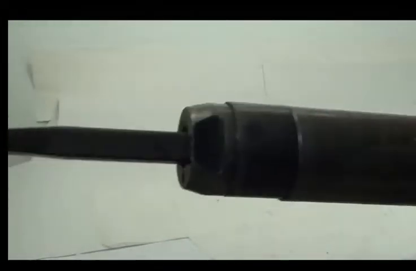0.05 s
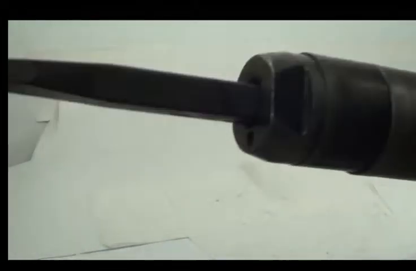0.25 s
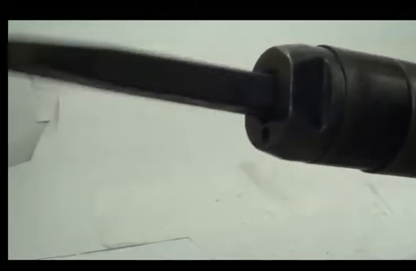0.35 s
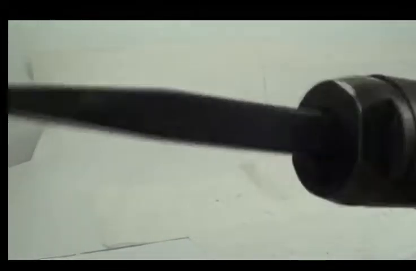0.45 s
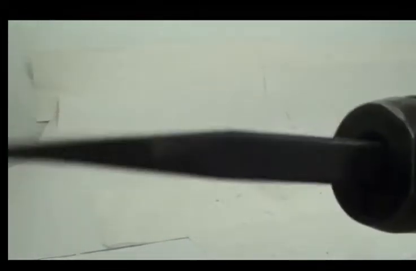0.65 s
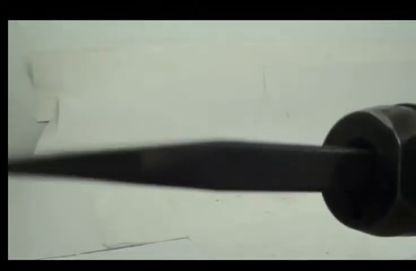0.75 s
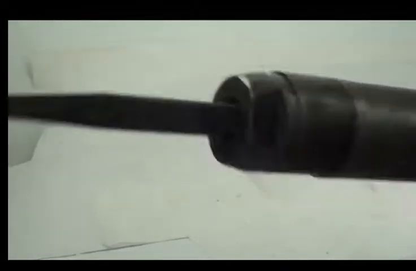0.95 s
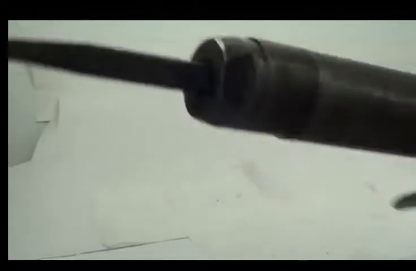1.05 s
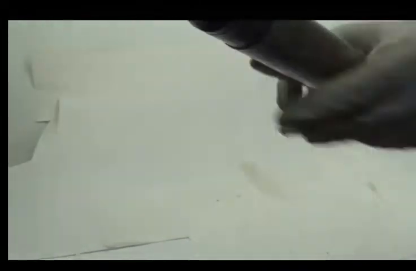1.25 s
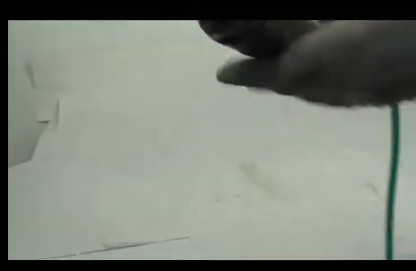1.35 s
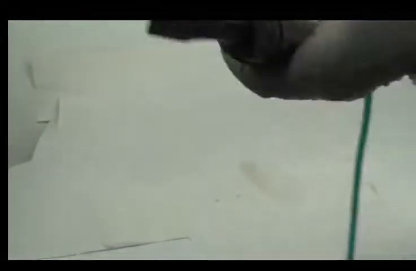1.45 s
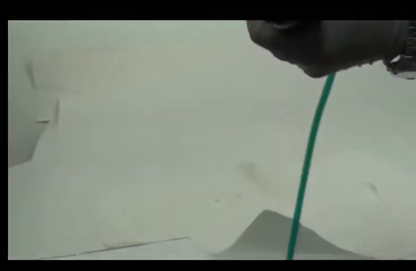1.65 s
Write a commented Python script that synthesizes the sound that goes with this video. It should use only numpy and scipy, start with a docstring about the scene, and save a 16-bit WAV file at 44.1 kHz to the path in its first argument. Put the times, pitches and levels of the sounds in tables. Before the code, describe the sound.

Pneumatic chisel fired twice in open air, fast metallic hammering and hiss, then a quiet room

```python
"""A quiet room with a faint hum; then air hisses in, a valve squeals, and an air chisel hammers close by.
The hand-held tool is triggered twice with nothing under its blade; the second run is slower and weaker.
A piston making about 50 strokes a second in the first run strikes the steel chisel: noise clacks, sine rings.
Each stroke also puffs out exhaust (low pulses and gusts of noise) and makes the hiss (coloured noise) surge.
The loose chisel rings on when the trigger is let go, and the room adds a short stereo tail."""
import sys
import numpy as np
from scipy import signal
from scipy.fft import rfft, irfft
from scipy.io import wavfile
from scipy.ndimage import uniform_filter1d

SR = 44100
rng = np.random.default_rng(int(sys.argv[2]) if len(sys.argv) > 2 else 0)


def int16_out(signal):
    """Quantize to a 16-bit WAV file."""
    q = np.round(np.clip(np.atleast_2d(signal).T, -1, 1) * 32767)
    wavfile.write(sys.argv[1], SR, q.astype(np.int16))


N = 74970
TIME = np.arange(N) / SR


def amp(db):
    """Turns decibels into gain."""
    return 10 ** (np.asarray(db) / 20)


def unit(x):
    """Scales a sound to rms 1."""
    return x / np.sqrt(np.mean(x ** 2) + 1e-20)


def curve(points):
    """Reads a time table at every sample, with straight lines between its points."""
    return np.interp(TIME, *np.transpose(points))


def read(points, hz):
    """Reads a frequency table at the given frequencies, on a logarithmic pitch scale."""
    f, value = np.transpose(points)
    return np.interp(np.log(hz + 1), np.log(f + 1), value)


def add(mix, s, sound):
    """Mixes a sound into mix, starting at s seconds."""
    part = mix[round(s * SR):][:len(sound)]
    part += sound[:len(part)]


def noise(spectrum):
    """Random noise with the colour of a spectrum table, scaled to rms 1."""
    white = rfft(rng.standard_normal(N))
    gain = amp(read(spectrum, np.fft.rfftfreq(N, 1 / SR)))
    return unit(irfft(white * gain, N))


def wander(rate_hz):
    """Smooth random motion of rms 1; a higher rate makes it move faster."""
    white = rfft(rng.standard_normal(N))
    smoothing = np.exp(-(np.fft.rfftfreq(N, 1 / SR) / rate_hz) ** 2)
    return unit(irfft(white * smoothing, N))


def pulse(spectrum, size=4096):
    """A short pulse with the given colour that starts at once (minimum phase)."""
    log_gain = np.log(amp(read(spectrum, abs(np.fft.fftfreq(size, 1 / SR)))))
    return np.fft.ifft(np.exp(np.conj(signal.hilbert(log_gain)))).real


# piston speed in each run, from first stroke to stall: t/s, f/Hz (strokes per second)
FIRST_RUN_SPEED = [(0.2548, 38.2), (0.29, 55.6), (0.39, 50.8), (0.49, 50.7), (0.61, 51.2), (0.69, 47.7),
                   (0.73, 52.5), (0.8, 42.8), (0.85, 30.2)]
SECOND_RUN_SPEED = [(1.0124, 38.2), (1.09, 48.1), (1.16, 43.7), (1.225, 43.4)]


def piston(turn):
    """Adds up the speed to find when the piston passes a given share of its cycle, in both runs."""
    times = []
    for speed in (FIRST_RUN_SPEED, SECOND_RUN_SPEED):
        t = np.arange(speed[0][0], speed[-1][0], 1 / SR)
        turns = np.cumsum(np.interp(t, *np.transpose(speed))) / SR
        times.extend(np.interp(np.arange(turn, turns[-1], 1), turns, t))
    return np.array(times)


# force of the piston: t/s, level/dB
PISTON_FORCE = [(.25, -2.5), (.29, -1), (.47, 1.5), (.72, 1), (.81, -2), (.85, -16.5), (1.01, -11.5),
                (1.06, -5), (1.22, -10)]


def force_at(s):
    """Force of the piston in dB at s seconds: it sets how strong the blows, puffs and surges are."""
    return np.interp(s, *np.transpose(PISTON_FORCE))


CONTACT_RISE_S, CLACK_DECAY_S = .0007, .0036


def clack(level_db):
    """Loudness shape of one steel-on-steel contact: a very fast rise and a short decay."""
    t = np.arange(SR // 20) / SR
    return amp(level_db) * np.minimum(t / CONTACT_RISE_S, 1) * np.exp(-t / CLACK_DECAY_S)


# modes (ringing tones) of the chisel:
# f/Hz, level/dB at full force, level/dB at low force, t60/s (time to fall 60 dB) while held in the barrel
CHISEL_MODES = [(2450, -39, -31, .14), (2530, -38, -31, .11), (5203, -16, -19, .07), (5370, -26, -27, .04),
                (6236, -12, -19, .11), (7250, -27, -28, .035), (8775, -15, -13, .1), (9040, -27, -25, .04),
                (9620, -18, -17, .085), (11365, -20, -26, .13), (13590, -28, -27, .05),
                (13710, -24, -20, .11)]
LOW_FORCE_DB = -7  # at or below this force the low-force levels apply fully
MODE_SPREAD_DB, MODE_WOBBLE_HZ = 1.8, 36


def ring(s, level_db):
    """The chisel's modes after a blow; their balance shifts with force and they wobble as it rattles."""
    hz, full_db, low_db, t60 = np.transpose(CHISEL_MODES)[:, :, None]
    t = np.arange(SR // 6) / SR
    low = np.clip(force_at(s) / LOW_FORCE_DB, 0, 1)
    size, phase = rng.standard_normal((2, len(CHISEL_MODES), 1))
    jitter = rng.standard_normal((len(CHISEL_MODES), len(t)))
    wobble = unit(uniform_filter1d(jitter, size=120, axis=1))
    mode_db = level_db + full_db + low * (low_db - full_db) + MODE_SPREAD_DB * size
    decay = 1000 ** (-t / t60)
    turns = np.cumsum(hz + MODE_WOBBLE_HZ * wobble, axis=1) / SR + phase
    tones = amp(mode_db) * decay * np.sin(2 * np.pi * turns)
    return tones.sum(0) * np.minimum(t / CONTACT_RISE_S, 1)


# colour of the contact noise: f/Hz, level/dB per Hz (relative)
CLACK_COLOUR = [(40, -51), (200, -32.5), (900, -19.5), (1800, -20), (3300, -15.5), (4300, -18), (5200, 2.5),
                (6200, -2.5), (7300, -4), (8100, -4), (9100, 1), (10500, -11), (12500, -12), (16000, -20)]
# hard knocks of the loose chisel against its retainer: t/s, level/dB
RETAINER_KNOCKS = [(.259, -5), (.297, -6), (0.314, -1), (0.8433, 2.5), (1.105, -5.5), (1.149, -4),
                   (1.194, -1), (1.217, -3.5)]
CLACK_DB, KNOCK_RING_DB = -7, -6.5
BLOW_DELAY_S, BLOW_JITTER_S, BLOW_SPREAD_DB = .0014, .0004, 1.2
REBOUND_DB, REBOUND_MIN_S, REBOUND_MAX_S = -4.5, .004, .016  # delays after the blow


def hammering():
    """Each stroke clacks on the chisel and rings it; the chisel rebounds and sometimes knocks its retainer."""
    contacts, rings = np.zeros(N), np.zeros(N)
    for s in piston(0):
        blow_db = force_at(s) + BLOW_SPREAD_DB * rng.standard_normal()
        blow = s + BLOW_DELAY_S + BLOW_JITTER_S * rng.standard_normal()
        rebound = blow + REBOUND_MIN_S + (REBOUND_MAX_S - REBOUND_MIN_S) * rng.random()
        for at, level_db in ((blow, blow_db), (rebound, blow_db + REBOUND_DB)):
            add(contacts, at, clack(level_db))
            add(rings, at, ring(at, level_db))
    for s, level_db in RETAINER_KNOCKS:
        add(contacts, s, clack(level_db))
        add(rings, s, ring(s, level_db + KNOCK_RING_DB))
    return amp(CLACK_DB) * contacts * noise(CLACK_COLOUR) + rings


# the chisel floats free and its nearest mode sings until it touches the barrel again:
# t/s, f/Hz, level/dB, free time/s
FREE_CHISEL = [(.258, 11360, -15, 0.011), (.844, 11360, -18.5, 0.054), (.844, 8770, -24, .045),
               (0.845, 6236, -22.5, 0.041), (1.149, 8770, -7, .06), (1.194, 13700, -24.5, 0.048),
               (1.217, 8770, -12, .078), (1.217, 5200, -20, 0.049), (1.217, 9620, -23, .048)]
FREE_T60_S, CAUGHT_T60_S = .68, .06  # the second decay joins the first once the chisel is caught
FREE_FLUTTER_DB = 1.1


def free_rings():
    """One mode sings on while the chisel floats, then dies quickly as it is caught."""
    out, t = np.zeros(N), np.arange(SR // 2) / SR
    modes = np.array(CHISEL_MODES)[:, 0]
    for s, near_hz, level_db, free_s in FREE_CHISEL:
        hz = modes[np.argmin(abs(modes - near_hz))] + 22 * wander(110)[:len(t)]
        fade = 1000 ** (-t / FREE_T60_S - np.maximum(t - free_s, 0) / CAUGHT_T60_S)
        level = amp(level_db + FREE_FLUTTER_DB * wander(70)[:len(t)])
        rise = np.minimum(t / CONTACT_RISE_S, 1)
        add(out, s, level * fade * rise * np.sin(2 * np.pi * np.cumsum(hz) / SR))
    return out


# colour of one exhaust puff: f/Hz, level/dB per Hz
PUFF_COLOUR = [(20, -45.5), (55, -21), (100, -2.5), (160, -0.5), (280, 1.5), (450, 0.5), (700, -8),
               (1100, -19), (2000, -33), (5000, -62)]
# colour of the turbulence after each puff: f/Hz, level/dB per Hz (relative)
GUST_COLOUR = [(25, -26.5), (60, -14), (110, -4.5), (250, -1.5), (420, -1.5), (700, -9), (1300, -15.5),
               (3000, -37)]
# echoes of the puffs from nearby surfaces: delay t/s, level/dB
PUFF_ECHOES = [(.0042, -15.5), (.0075, -14.5), (0.0123, -16.5)]
PUFF_DB, PUFF_LEAD_S, PUFF_JITTER_S, PUFF_SPREAD_DB = 13, .00081, .00045, .7
# the return puff: share of the cycle, level, and how much of the force in dB it follows
RETURN_TURN, RETURN_DB, RETURN_FORCE_SHARE = .49, -14, .55
GUST_DB, GUST_DECAY_S = -35.5, .0092


def exhaust():
    """Air puffs out low on each forward stroke, weaker on the return, trailed by a gust and echoes."""
    kicks, t = np.zeros(N), np.arange(SR // 10) / SR
    for turn, stroke_db, share in ((0, 0, 1), (RETURN_TURN, RETURN_DB, RETURN_FORCE_SHARE)):
        for s in piston(turn):
            late, size = rng.standard_normal(2)
            kick_db = stroke_db + share * force_at(s) + PUFF_SPREAD_DB * size
            add(kicks, s - PUFF_LEAD_S + PUFF_JITTER_S * late, amp([kick_db]))
    puffs = -amp(PUFF_DB) * signal.fftconvolve(kicks, pulse(PUFF_COLOUR))[:N]
    gust_shape = signal.fftconvolve(kicks, np.exp(-t / GUST_DECAY_S))[:N]
    out = puffs + amp(GUST_DB) * noise(GUST_COLOUR) * gust_shape
    for delay_s, level_db in PUFF_ECHOES:
        add(out, delay_s, amp(level_db) * puffs)
    return out


# air flow through the valve: t/s, level/dB
AIR_FLOW = [(0, -58.5), (.19, -59), (.199, -36), (.215, -30.5), (.235, -17.5), (.29, -17.5), (.76, -18.5),
            (.83, -22.5), (.87, -31), (.91, -42), (.947, -44.5), (.97, -27.5), (1.015, -19.5),
            (1.09, -16.5), (1.17, -19), (1.23, -23), (1.27, -36), (1.34, -69.5)]
# colour of the escaping air: f/Hz, level/dB per Hz (relative)
HISS_COLOUR = [(40, -51.5), (200, -30), (600, -23), (1200, -29.5), (2100, -24), (3200, -12.5),
               (4200, -15.5), (5200, -6.5), (6400, -1.5), (7600, -4.5), (10000, -7.5), (12500, -13.5),
               (14500, -13), (16000, -18)]
# surge depth at 0 dB force, share of the cycle where it peaks, random flutter
HISS_PULSING, HISS_PEAK_TURN, HISS_FLUTTER_DB = .21, .3, 1.22


def hiss():
    """Escaping air follows the flow and surges once in every stroke."""
    strokes = piston(0)
    turns = np.interp(TIME, strokes, np.arange(len(strokes)))
    depth = HISS_PULSING * amp(force_at(TIME))
    surge = 1 + depth * np.cos(2 * np.pi * (turns - HISS_PEAK_TURN))
    return noise(HISS_COLOUR) * surge * amp(curve(AIR_FLOW) + HISS_FLUTTER_DB * wander(150))


# squeal of the opening valve: t/s, level/dB
VALVE_SQUEAL = [(.195, -56.5), (.222, -33), (.231, -18.5), (.236, -6), (.246, -11.5), (.254, -30),
                (.265, -63)]
SQUEAL_HZ, SQUEAL_WIDTH_HZ = 6360, 160


def squeal():
    """The valve whistles just before the piston starts, unsteady in pitch and level."""
    hz = SQUEAL_HZ + SQUEAL_WIDTH_HZ * wander(500)
    sounding = (TIME > VALVE_SQUEAL[0][0]) & (TIME < VALVE_SQUEAL[-1][0])
    level = amp(curve(VALVE_SQUEAL) + 3.1 * wander(300))
    return sounding * level * np.sin(2 * np.pi * np.cumsum(hz) / SR)


# colour of the passing rush of air: f/Hz, level/dB per Hz (relative)
RUSH_COLOUR = [(30, -10), (70, -6), (150, -8), (450, -2), (800, -5.5), (1400, -5), (2200, -10.5), (3400, 0),
               (4500, -8.5), (9000, -25)]
RUSH_MIDDLE_S, RUSH_WIDTH_S, RUSH_DB = .3044, .028, -28


def rush():
    """Air passes the microphone as the piston gets going: a brief swell of noise."""
    swell = np.exp(-((TIME - RUSH_MIDDLE_S) / RUSH_WIDTH_S) ** 2)
    return amp(RUSH_DB) * noise(RUSH_COLOUR) * swell


# room decay: f/Hz, t60/s
ROOM_DECAY = [(100, 0.2), (500, 0.1), (2000, 0.19), (6000, 0.57), (9000, 0.44), (15000, 0.3)]
# strength of the room's answer: f/Hz, level/dB
ROOM_LEVEL = [(100, -14), (400, -11.5), (1000, -9.5), (2500, -14.5), (6000, -17), (14000, -19.5)]
# stereo width of the room's answer: f/Hz, side gain over mid
ROOM_SPREAD = [(100, .3), (300, .7), (600, 0.83), (1100, 1.9), (2500, 0.61), (8000, 0.69), (14000, .4)]


def room(x):
    """Many small reflections make a short diffuse tail, built from fading noise, widest in the mid range."""
    hz, t, z = signal.stft(rng.standard_normal((2, SR)), SR, nperseg=256)
    fade = 1000 ** (-t / read(ROOM_DECAY, hz)[:, None]) * np.minimum(t / .0069, 1)
    # the energy of each band is set by its level, however long it decays
    fade *= amp(read(ROOM_LEVEL, hz))[:, None] / np.sqrt(SR * np.mean(fade ** 2, axis=1, keepdims=True))
    z[1] *= read(ROOM_SPREAD, hz)[:, None]
    tails = signal.istft(z * fade, SR, nperseg=256)[1]
    mid, side = signal.fftconvolve(x[None], tails, axes=1)[:, :N]
    return np.array([mid + side, mid - side])


# colour of the quiet room air: f/Hz, level/dB per Hz (relative)
ROOM_AIR = [(25, -12.5), (65, -1), (110, -8), (200, -2.5), (330, -7), (800, -7.5), (2000, -15), (7000, -19),
            (11000, -31), (16000, -41)]
# faint hum: t/s, f/Hz, level/dB
FAINT_HUM = [(0, 215, -67), (.9, 221, -66), (1.35, 237.5, -63), (1.7, 242.2, -63)]
ROOM_AIR_DB = -61


def background():
    """Quiet room air, as noise slightly spread in stereo, and a faint hum of wavering pitch."""
    s, hz, level_db = np.transpose(FAINT_HUM)
    pitch = curve(np.c_[s, hz]) + 4 * wander(15)
    hum = amp(curve(np.c_[s, level_db])) * np.sin(2 * np.pi * np.cumsum(pitch) / SR)
    left_right = np.array([[1], [-1]])
    return hum + amp(ROOM_AIR_DB) * (noise(ROOM_AIR) + .4 * noise(ROOM_AIR) * left_right)


def scene():
    """The tool straight ahead, its room tail and the background."""
    tool = hammering() + free_rings() + exhaust() + hiss() + squeal() + rush()
    return tool + room(tool) + background()


LOW_CUT_HZ, EDGE_HZ = 60, 15800


def record(dry):
    """The loudest peaks overload softly; then the microphone's bass roll-off and the upper band limit."""
    ceiling = .84
    clipped = dry / (1 + (dry / ceiling) ** 6) ** (1 / 6)
    low_cut = signal.butter(2, LOW_CUT_HZ, "high", fs=SR, output="sos")
    thinned = signal.sosfilt(low_cut, clipped)
    band_limit = signal.firwin(511, EDGE_HZ, window=("kaiser", 9), fs=SR)
    return signal.oaconvolve(thinned, band_limit[None], "same")


dry = scene()
out = record(dry)
int16_out(out)
```